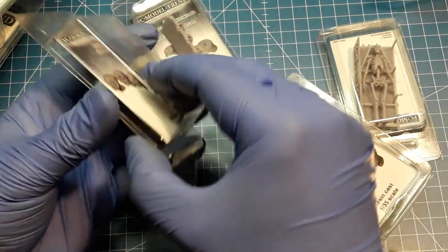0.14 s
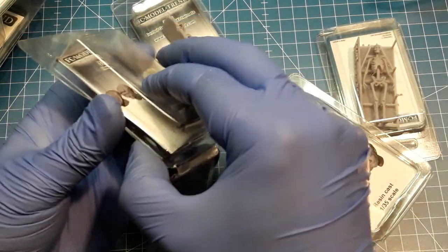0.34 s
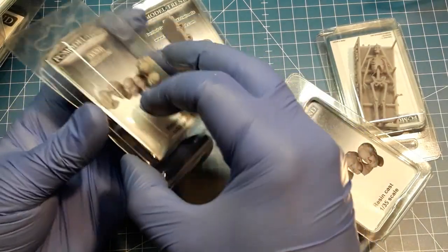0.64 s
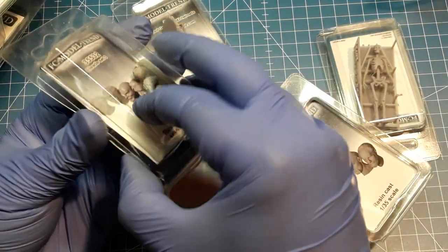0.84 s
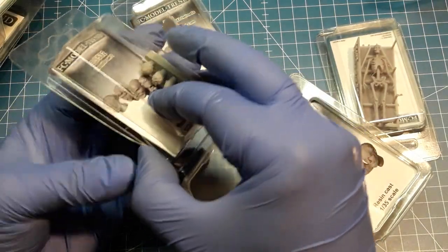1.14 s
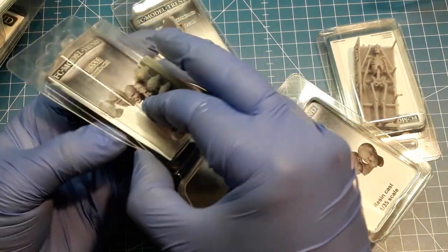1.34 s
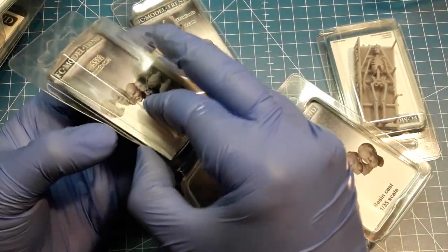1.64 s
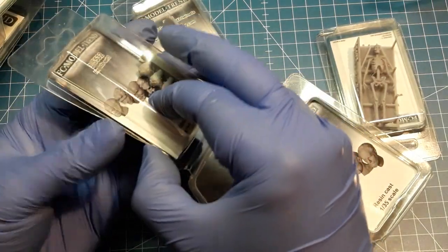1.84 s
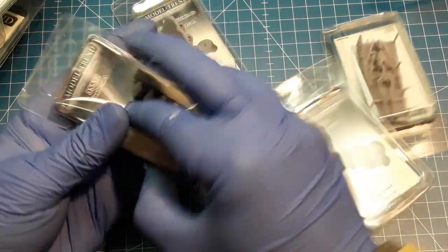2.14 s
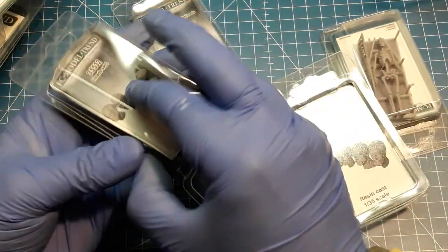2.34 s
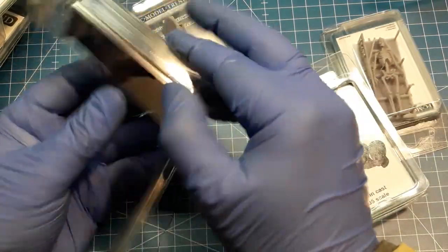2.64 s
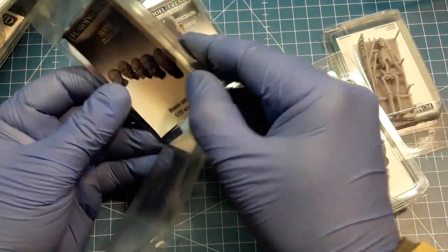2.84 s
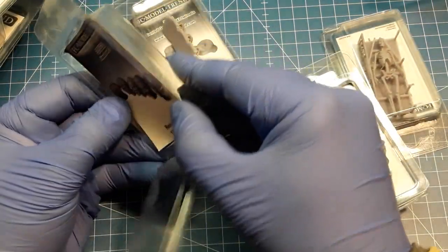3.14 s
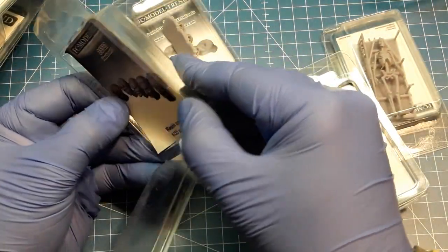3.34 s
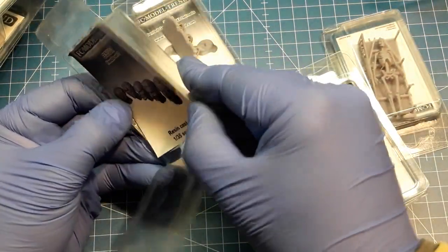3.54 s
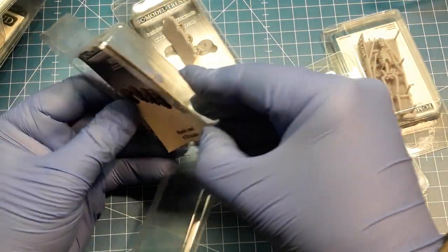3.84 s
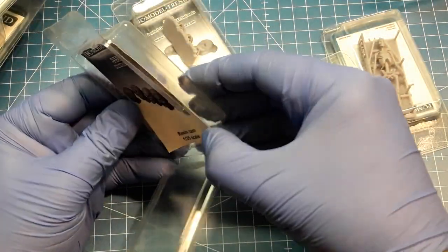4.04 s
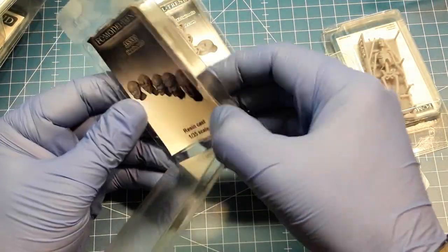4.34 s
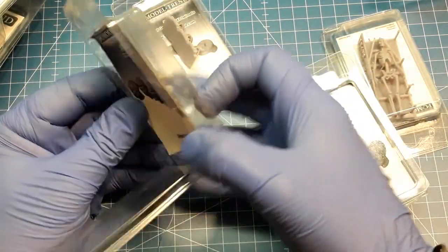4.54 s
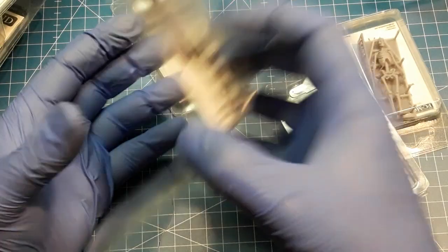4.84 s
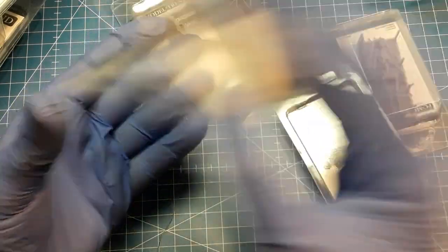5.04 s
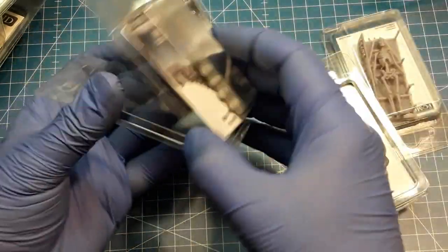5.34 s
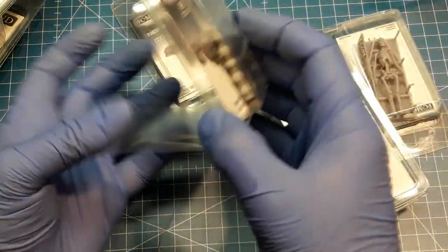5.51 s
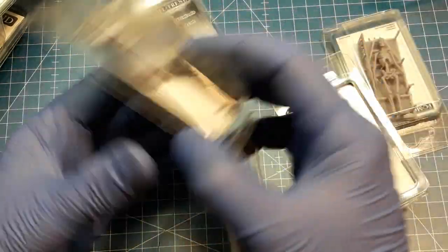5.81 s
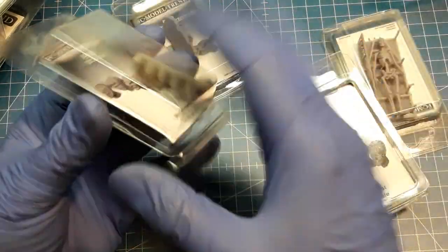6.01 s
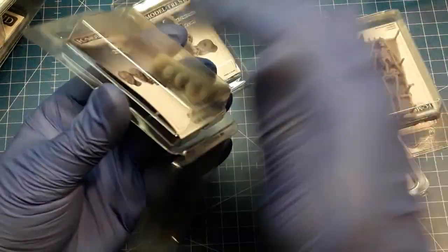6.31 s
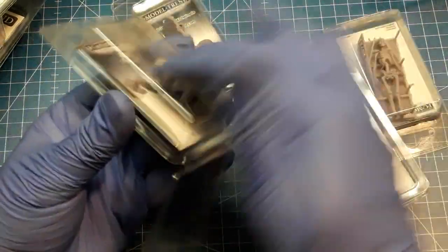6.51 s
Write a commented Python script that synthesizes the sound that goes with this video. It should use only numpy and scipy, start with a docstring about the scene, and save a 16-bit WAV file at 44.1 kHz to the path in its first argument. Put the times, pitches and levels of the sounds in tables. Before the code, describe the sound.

Close perspective in a small room, with a short reverberation and a very faint steady background. Gloved hands squeeze a stiff, thin plastic blister pack. At first there are small ticks, light crinkling and brief rubbery swishes, then one sharp, hollow snap at 0.7 s. Faint creaks and isolated ticks follow until about 2.1 s, when a cluster of crisp crackles breaks out with a card insert scraping inside. A glove swish and dull bumps come around 2.5 s. From 2.8 to 4.2 s, moderate clicks alternate with short ratcheting creaks, another scrape at 3.5 s and a thumping click at 4.25 s. After a quieter moment, a loud snap at 5.1 s bursts into dense crackle until 5.3 s. Near-quiet small ticks follow, then the loudest double snap at 6.27 s with a heavy hollow thump, creaking, and last pops at 6.5 s.

```python
"""Gloved hands on a blister pack

Gloved hands work a stiff plastic blister pack open and press it shut again, close by in a small room.
The thin shell buckles in sharp snaps (decaying modes with noise), its tight rim creaks in stick-slip runs
(trains of the same pops), gloves swish over the plastic and the card insert scrapes inside (filtered grains).
Dull thumps of the pack, stray ticks and a soft crinkle under the grip fill in, over a faint steady background.
"""
import sys
import numpy as np
from scipy import signal
from scipy.fft import rfft, irfft, next_fast_len
from scipy.io import wavfile
from scipy.ndimage import map_coordinates

SR = 44100
rng = np.random.default_rng(int(sys.argv[2]) if len(sys.argv) > 2 else 0)


def inscribe(sig):
    """Save sig as 16-bit PCM at rate SR to the path in sys.argv[1].

    A 1-D sig is mono; a 2-D sig holds one channel per row.
    Samples are clipped to [-1, 1] before scaling.
    """
    pcm = np.round(np.clip(np.atleast_2d(sig).T, -1, 1) * 32767)
    wavfile.write(sys.argv[1], SR, pcm.astype(np.int16))


N = 294147

# dull spectrum of the card insert and the hollow pack: frequency_hz, gain_db
CARD_SPECTRUM = [(41, -52.5), (70, -19), (233, -9), (368, -8), (483, -14), (711, -6.5), (1510, -1),
                 (1650, -5.5), (2120, -9), (3570, -20), (6590, -23.5), (16000, -45)]


def amp(db):
    """Level as a logarithm: decibels to amplitude gain."""
    return 10 ** (np.asarray(db) / 20)


def unit(x):
    """Power normalisation: scale to rms 1."""
    return x / np.sqrt(np.mean(x ** 2) + 1e-20)


def burst(x):
    """Energy normalisation: scale a short sound to the energy of 1 ms at rms 1."""
    return x / np.sqrt(np.sum(x ** 2) * 1000 / SR + 1e-20)


def along(points, hz):
    """Interpolation of (frequency_hz, value) points on a logarithmic frequency axis."""
    point_hz, values = np.transpose(points)
    return np.interp(np.log(hz + 1), np.log(point_hz), values)


def colour(x, points):
    """Minimum-phase filtering: the folded cepstrum of a gain curve gives a causal response."""
    size = 2 * next_fast_len(len(x) // 2 + 1024)
    gain = amp(along(points, np.fft.rfftfreq(size, 1 / SR)))
    cepstrum = irfft(np.log(gain))
    cepstrum[1:size // 2] *= 2
    cepstrum[size // 2 + 1:] = 0
    response = np.exp(rfft(cepstrum))
    return irfft(rfft(x, size) * response)[:len(x)]


def fade(t, t60):
    """Exponential damping: a fall of 60 dB in the time t60."""
    return np.exp(-np.log(1000) * t / t60)


def add(track, s, sound):
    """Superposition: mix a sound into the track at time s in seconds."""
    part = track[max(round(s * SR), 0):][:len(sound)]
    part += sound[:len(part)]


def grains(rate, spread_db):
    """Shot noise: random impulses, rate a second on average, of uneven size and either sign, rms 1."""
    sizes = amp(spread_db * np.clip(rng.standard_normal(N), -2, 2)) * rng.choice([-1, 1], N)
    return unit(sizes * (rng.random(N) < rate / SR))


def wobble(rate):
    """Band-limited random modulation: a smooth curve through rate random knots a second."""
    knots = rng.standard_normal(int(N * rate / SR) + 4)
    return map_coordinates(knots, [np.arange(N) * rate / SR])


def background():
    """Stationary noise: a faint steady background of fixed spectrum."""
    # frequency_hz, gain_db
    quiet_spectrum = [(15, -39), (25, -6.5), (53, -4), (217, 1), (326, -11), (405, -16.5), (1100, -13),
                      (1500, -11.5), (2690, -20.5), (4300, -17), (7920, -34), (14000, -21.5), (16000, -33)]
    return amp(-63.0) * unit(colour(rng.standard_normal(N), quiet_spectrum))


def room(x):
    """Reverberation: desk and walls answer with decaying noise, and the echo pattern drifts as the pack moves."""
    # reverberation of the walls: frequency_hz, t60_s
    wall_decay = [(150, 0.41), (600, 0.31), (2000, 0.22), (6000, 0.3), (15000, 0.32)]
    t = np.arange(N) / SR
    wet = np.zeros(N)
    # a fresh echo every half second; cosine windows crossfade neighbours at equal power
    for s in np.arange(0, N / SR + .5, .5):
        hz, age, bands = signal.stft(rng.standard_normal(SR // 2), SR, nperseg=256)
        bands = bands * fade(age, along(wall_decay, hz)[:, None])
        tail = signal.istft(bands, SR, nperseg=256)[1]
        age = np.arange(len(tail)) / SR
        desk = rng.standard_normal(len(tail)) * fade(age, 0.056) * (age > .0015)
        tail = tail * (1 - np.exp(-age / 0.0081))
        echo = amp(-9.5) * tail / np.linalg.norm(tail) + amp(-10) * desk / np.linalg.norm(desk)
        near = np.abs(t - s) < .5
        window = np.cos(np.pi * (t[near] - s))
        add(wet, t[near][0], signal.fftconvolve(x[near] * window, echo))
    return wet


def grip():
    """Strain on the shell in dB: the tightest squeeze of the moment prevails."""
    # the fingers squeeze and relax: tightest_s, level_db, tighten_s, relax_s
    squeezes = [(.04, -43, 0.24, 0.26), (.72, -43, 0.4, 0.51), (1.2, -53, 0.9, 0.2), (1.88, -51, 0.23, .2),
                (2.11, -29, 0.062, 0.26), (2.66, -42, 0.4, 0.18), (3.03, -43.5, 0.34, 0.29),
                (3.6, -37.5, .15, 0.1), (4.13, -47, 0.14, 0.45), (4.721, -42.5, 0.28, 0.17),
                (5.15, -32, .06, 0.22), (5.321, -36.5, 0.091, 0.092), (6.11, -37.5, 0.13, .13),
                (6.32, -24.5, .03, 0.17), (6.56, -37.5, 0.081, 0.24)]
    range_db = 19.5  # rise over the tightening time, fall over the relaxing time
    t = np.arange(N) / SR
    strains = [db - range_db * np.maximum((s - t) / tighten, (t - s) / relax)
               for s, db, tighten, relax in squeezes]
    return np.max(strains, axis=0)


def handling():
    """Friction and micro-buckling under the grip: the card rubs dully, the shell crinkles in small grains."""
    # both spectra: frequency_hz, gain_db
    rub_spectrum = [(50, -23), (110, -5.5), (200, -5.5), (400, 4), (800, 1), (1300, -19), (3000, -16.5)]
    crinkle_spectrum = [(400, -22), (900, -2), (1500, 5.5), (2150, -1.5), (2700, -3), (4500, -11),
                        (7000, -17.5), (8200, -39), (15500, -32)]
    rub_at_45_db, rub_follows = -63.5, 0.23  # rubbing at a grip of -45 dB, and its dB per dB of grip
    grip_db = grip()
    rub = unit(colour(grains(rate=1500, spread_db=3), rub_spectrum))
    clumps = grains(rate=3000, spread_db=4) * amp(3 * wobble(130))
    crinkle = unit(colour(clumps, crinkle_spectrum))
    rub_db = rub_at_45_db + rub_follows * (grip_db + 45)
    return amp(rub_db) * rub + amp(grip_db - 8) * crinkle


def card():
    """Rough sliding contact: the insert's edge catches in coarse, dull grains; each pull swells and fades."""
    # the edge drags along the shell: start_s, end_s, level_db (peak of the pull, before a 4.5 dB cut)
    scrapes = [(2.067, 2.156, -30), (2.15, 2.404, -41), (2.625, 2.681, -40.5), (3.505, 3.658, -30.5),
               (6.047, 6.168, -39)]
    pull_shape = 1.26  # the higher, the more a pull is gathered in its middle
    t = np.arange(N) / SR
    pulls = np.zeros(N)
    for start, end, db in scrapes:
        done = np.clip((t - start) / (end - start), 0, 1)
        pulls += amp(db) * np.abs(np.sin(np.pi * done)) ** pull_shape
    return amp(-4.5) * pulls * unit(colour(grains(rate=700, spread_db=4.5), CARD_SPECTRUM))


def slides():
    """Envelope of the sliding friction: a quick touch, a steady swell in dB, a quick release."""
    # a glove slides until it lets go: start_s, end_s, level_db (at the end, before the cut in gloves)
    swishes = [(0.062, 0.104, -42.5), (0.412, 0.458, -31), (0.492, 0.559, -41), (0.862, .91, -57),
               (2.474, 2.559, -34), (5.531, 5.628, -48.5), (6.432, 6.463, -42.5)]
    swell_db_per_s, touch_s, let_go_t60_s = 246, 0.0017, 0.034
    t = np.arange(N) / SR
    strokes = np.zeros(N)
    for start, end, db in swishes:
        swell = amp(db - swell_db_per_s * np.maximum(end - t, 0))
        touch = np.clip((t - start) / touch_s, 0, 1)
        strokes += swell * touch * fade(np.maximum(t - end, 0), let_go_t60_s)
    return strokes


def gloves():
    """Micro-slip friction: rubber on the shell merges dense slips into a gritty swish with brief squeaks."""
    # frequency_hz, gain_db
    glove_spectrum = [(290, -57), (500, -29), (1260, -16.5), (2160, -3), (2500, -14.5), (2890, -3),
                      (3700, -11.5), (4870, -10), (5390, -16.5), (6610, -11), (9220, -23.5), (14900, -18.5),
                      (16000, -35)]
    creep_at_45_db, creep_follows = -65.5, 0.58  # creeping at a grip of -45 dB, and its dB per dB of grip
    grit = unit(colour(grains(rate=7000, spread_db=3), glove_spectrum))
    squeak_hz = 2850 * np.exp(.2 * wobble(110) + .07 * wobble(1200))
    tone = np.sin(2 * np.pi * np.cumsum(squeak_hz) / SR)
    squeak = unit(tone * wobble(500) * amp(3 * wobble(90)))
    # the hollow pack drones under the sliding glove
    body = unit(colour(grains(rate=1500, spread_db=3), CARD_SPECTRUM))
    creep = amp(creep_at_45_db + creep_follows * (grip() + 45))
    swish = grit + amp(-3.5) * squeak + amp(-12) * body
    return amp(-1.5) * slides() * swish + creep * grit


def thumps():
    """Heavily damped resonance: air pocket and broad faces give a dull bump that the hands damp at once."""
    # the hollow pack is bumped as a whole: time_s, level_db (before a 1 dB boost), pitch_hz
    bumps = [(2.577, -32.5, 389), (2.645, -29, 176), (4.247, -22, 330), (5.11, -28, 190.3),
             (6.275, -15.5, 278), (6.279, -12, 427), (6.324, -26, 232)]
    track = np.zeros(N)
    t = np.arange(SR // 8) / SR
    envelope = fade(t, 0.018) * (1 - np.exp(-t / 0.0017))
    for s, db, hz in bumps:
        add(track, s, amp(db + 1.0) * np.sin(2 * np.pi * hz * t) * envelope)
    return track


def pop(knock_db, crack_db, hz, life):
    """Snap-through buckling: a panel flips, the shell's modes ring, the pack knocks and the crease cracks.

    The factor life scales the decays and rises; the knock is raised by 6 dB and the crack by 3 dB.
    """
    # modes of the shell: frequency_hz, level_db (mean of a random spread), t60_s (at life 1)
    shell_modes = [(650, -18, 0.065), (790, -14.5, 0.026), (860, 1, 0.03), (1010, 3, 0.018),
                   (1220, -24.5, 0.017), (1380, -17.5, 0.1), (1473, 2.5, 0.045), (1560, -4, 0.07),
                   (1780, 6.5, 0.048), (1890, 8.5, 0.051), (2075, 0.5, 0.11), (2440, -17.5, 0.023),
                   (2870, -4.5, 0.077), (3110, -10.5, 0.2)]
    # spectra of the three noises: frequency_hz, gain_db
    flex_spectrum = [(400, -26), (900, -1), (1500, 4), (2200, 4), (2700, -9), (3200, -9.5), (5200, -11.5),
                     (7000, -29.5), (12000, -48.5)]
    knock_spectrum = [(40, -24.5), (110, -19.5), (250, -9), (450, 0.5), (800, 3), (1200, -1), (2500, -27.5),
                      (6000, -71)]
    crack_spectrum = [(1200, -25.5), (2600, 1), (3300, 4), (5300, 2), (7000, 0), (8000, -12), (11000, -8.5),
                      (16000, -13)]
    t = np.arange(SR // 20) / SR
    age = t / life
    # a buckle takes a moment to run through
    noise = rng.standard_normal((3, len(t))) * (1 - np.exp(-age / 0.0018))

    tones = np.sin(2 * np.pi * hz * t) + 0.1 * np.sin(2 * np.pi * 1.83 * hz * t)
    panel = burst(tones * fade(age, 0.015) * (1 - np.exp(-age / 0.00035)))
    flex = burst(colour(noise[0] * fade(age, 0.012), flex_spectrum))
    modes = np.zeros(len(t))
    for mode_hz, db, t60 in shell_modes:
        size = amp(db + rng.normal(0, 2.1)) * rng.choice([-1, 1])
        modes += size * np.sin(2 * np.pi * mode_hz * t) * fade(age, t60)
    ring = burst(panel + amp(-2.0) * flex + amp(-4.5) * burst(modes))

    knock = burst(colour(noise[1] * fade(age, 0.03), knock_spectrum))
    # the instant at which the crease gives way
    tick = np.arange(len(t)) == int(life * rng.uniform(.0003, .002) * SR)
    tearing = burst(noise[2] * fade(age, 0.012)) + amp(-4.5) * burst(1. * tick)
    crack = burst(colour(tearing, crack_spectrum))
    return ring + amp(knock_db + 6) * knock + amp(crack_db + 3.0) * crack


def ticks():
    """Random small buckles: a dozen creases of the strained shell give way, louder the tighter the grip."""
    ticks_per_s, above_grip_db, spread_db = 20, 6, 4.5
    track, grip_db = np.zeros(N), grip()
    creases = [pop(knock_db=-16, crack_db=-23.5, hz=1810 * np.exp(0.31 * detune), life=0.41)
               for detune in rng.uniform(-0.85, 1, size=12)]
    # one tick at a random moment of each time slot
    for k, (when, size, which) in enumerate(rng.random((int(ticks_per_s * N / SR), 3))):
        s = (k + when) / ticks_per_s
        db = grip_db[min(int(s * SR), N - 1)] + above_grip_db + spread_db * (2 * size - 1)
        add(track, s, amp(db) * creases[int(which * len(creases))])
    return track


def creaks():
    """Stick-slip friction: runs of slips along the rim; the more even a run, the more alike its slips."""
    # start_s, end_s, slips_per_s (mid-run), level_db (mid-run, before the arch and a 2.5 dB cut),
    # growth_db (over the run), knock_db (re ring, before the boost in pop), pitch_hz, unevenness (0-1)
    runs = [(0.739, 0.805, 137, -39.5, -15, -13.5, 1900, 0.29),
            (0.87, 0.924, 147, -38, 8, -18.5, 2120, 0.45), (1.104, 1.155, 277, -46, -4.5, -17, 1980, 0.24),
            (1.176, 1.239, 50, -38.5, 0, -13, 2098, 0.13), (1.381, 1.453, 45, -37.5, 2, -15.5, 2254, 0.19),
            (1.548, 1.68, 102, -42, -11, -14, 2100, .35), (1.89, 2.013, 183, -38.5, -10, -12, 1895, 0.34),
            (2.774, 2.787, 225, -38, -8, -30, 2110, 0.2), (2.928, 3.031, 155, -40.5, 7, -17, 1907, .25),
            (3.025, 3.08, 240, -28, 1, -30, 2349, .4), (3.158, 3.22, 156, -32, 3, -13, 1670, .2),
            (3.527, 3.65, 216, -39, -8, -17, 1389, .35), (3.845, 3.912, 84, -32, -5.5, -23, 1350, .05),
            (3.972, 4.055, 122, -37, 1, -18, 1700, 0.3), (4.107, 4.221, 140, -37, -6.5, -34, 1670, 0.2),
            (5.084, 5.131, 330, -20, 4.5, -21, 1422, .35), (6.277, 6.34, 167, -16, -10, -20.5, 1788, .3),
            (6.513, 6.583, 130, -22.5, -8.5, -20, 1940, .4)]
    speedup = .15  # share by which the slips quicken over a run
    arch_db = 1.5  # a run is lifted in its middle
    crack_db = -17  # relative to the ring, before the boost in pop
    track = np.zeros(N)
    for start, end, rate, db, growth_db, knock_db, hz, uneven in runs:
        # the faster the slips, the tighter the grip that damps them
        life = np.clip(60 / rate + uneven / 2, .25, 1)
        spot = pop(knock_db, crack_db, hz, life)
        fresh = np.clip(.15 + 2 * uneven, 0, 1)  # share of energy that is new in each slip
        s = start
        for gap, size, detune in rng.standard_normal((64, 3)):
            done = (s - start) / (end - start)
            if done > 1:
                break
            new_spot = pop(knock_db, crack_db, hz * np.exp(.5 * uneven * detune), life)
            slip = np.sqrt(1 - fresh) * spot + np.sqrt(fresh) * new_spot
            level_db = db + growth_db * (done - .5) + arch_db * np.sin(np.pi * done)
            add(track, s, amp(level_db - 2.5 + 4.5 * uneven * size) * slip)
            s += np.exp(uneven * gap) / (rate * (1 + speedup * (done - .5)))
    return track


def snaps():
    """Snap-through instability: single buckles, from small ticks to the rim popping open and shut."""
    # the shell buckles or is knocked: time_s, level_db (of the ring, before a 3 dB cut),
    # knock_db and crack_db (re ring, before the boosts in pop), pitch_hz (of the panel)
    buckles = [(0.108, -31.5, -33, -13, 1450), (.122, -34.5, -7.5, -1, 1470),
               (.290, -40.5, -9.5, -4.5, 1530), (0.501, -32, -8.5, -5, 2350), (0.646, -31, -17, -19, 1860),
               (0.7328, -5.5, -18.5, -46, 1620), (1.2635, -34.5, -32, -15.5, 2300),
               (1.284, -34, -16, -29, 2050), (1.356, -32.5, -13.5, -13.5, 918),
               (1.467, -28.5, -9, -12.5, 1558), (1.530, -31.5, -7, -16, 2152), (1.787, -32, -14, -20, 1040),
               (1.936, -21, -16, -33, 1890), (2.0907, -12.5, -9, -6, 1836), (2.116, -14, -11.5, -12, 2140),
               (2.128, -10.5, -10, -13.5, 2090), (2.18, -25, -8.5, -29, 1720),
               (2.205, -20.5, -7.5, -31, 1560), (2.249, -20, -17, -33, 870), (2.2595, -30.5, -8, -4, 1020),
               (2.319, -30, -2.5, -15, 1080), (2.340, -25, -11.5, -31, 960), (2.699, -32.5, -18, -8, 1460),
               (2.723, -24.5, -16, -25, 1088), (2.734, -25.5, -29, -15.5, 1790),
               (2.874, -34.5, -27, -19, 1890), (3.240, -24, -16, -11.5, 1998), (3.284, -34, -15, -8, 1440),
               (3.303, -26.5, -14.5, -12.5, 1380), (3.3406, -18.5, -35, -10.5, 1820),
               (3.375, -28.5, -19, -10, 1750), (3.670, -24.5, -17, -10.5, 1900),
               (3.781, -30.5, -17, -13.5, 1383), (3.8218, -24.5, -17, -12.5, 1360),
               (3.930, -31.5, -29, -14, 1420), (4.056, -25, -20, -14.5, 1873),
               (4.129, -26.5, -30, -35, 1550), (4.247, -18.5, -9.5, -8.5, 1340),
               (4.280, -26.5, -24, -16, 1700), (4.563, -28.5, -11, -16.5, 1040),
               (4.671, -31, -8, -11.5, 1850), (4.739, -30, -11, -14.5, 1407),
               (5.042, -18.5, -16, -14.5, 1764), (5.058, -11, -22, -23.5, 1198),
               (5.103, -0.5, -17, -9, 1489), (5.116, -9.5, -11.5, -6.5, 1260),
               (5.142, -13, -18, -9.5, 1340), (5.154, -13.5, -22, -28, 1640),
               (5.225, -15.5, -37, -13.5, 1457), (5.235, -17, -23, -7, 1414),
               (5.260, -26.5, -11, -11, 1246), (5.293, -19, -15.5, -25, 1190), (5.661, -28, -33, -3, 1710),
               (5.850, -39, -13, -20, 1580), (5.915, -37, -12.5, -16, 1440), (6.000, -35.5, -35, -14, 1480),
               (6.270, 4, -19.5, -18.5, 1606), (6.276, 1, -27, -14.5, 1566),
               (6.3545, -10.5, -17.5, -20.5, 1419), (6.3858, -16, -22, -17, 1439),
               (6.398, -20.5, -14, -15.5, 2130), (6.507, -10.5, -7.5, -15, 1680),
               (6.589, -29, -12, 3, 2390)]
    track = np.zeros(N)
    for s, db, knock_db, crack_db, hz in buckles:
        add(track, s, amp(db - 3) * pop(knock_db, crack_db, hz, life=1))
    return track


def scene():
    """Superposition of pack, room and background; a high-pass keeps deep bass out of the pack's sounds."""
    pack = snaps() + thumps() + creaks() + ticks() + gloves() + card() + handling()
    low_cut = signal.butter(3, 127, "highpass", fs=SR, output="sos")
    pack = signal.sosfilt(low_cut, pack)
    return (pack + room(pack) + background())[None]


def record(dry):
    """Soft saturation and band-limiting: peaks are rounded off, rumble and the extreme treble removed."""
    top_hz = 16200
    held = dry / (1 + (dry / .9) ** 6) ** (1 / 6)
    held = signal.sosfilt(signal.butter(2, 45, "highpass", fs=SR, output="sos"), held)
    size = next_fast_len(N + SR // 2)
    passed = np.fft.rfftfreq(size, 1 / SR) < top_hz
    return irfft(rfft(held, size) * passed, size)[:, :N]


dry = scene()
out = record(dry)
inscribe(out)
```